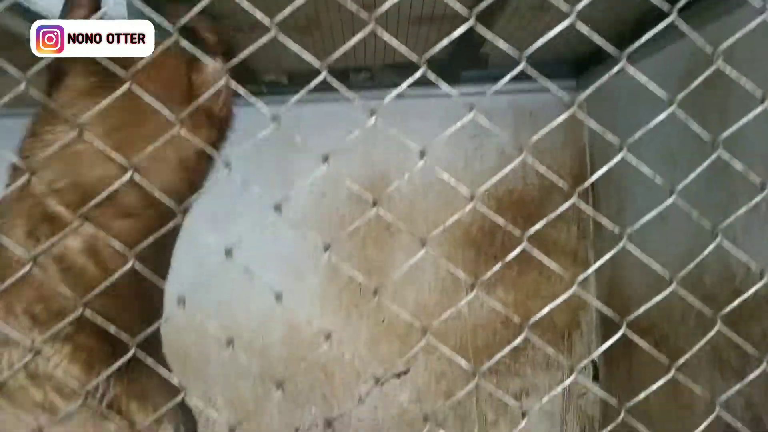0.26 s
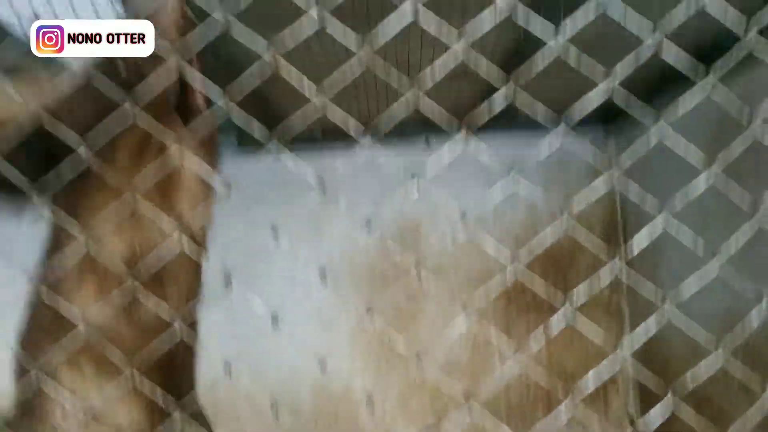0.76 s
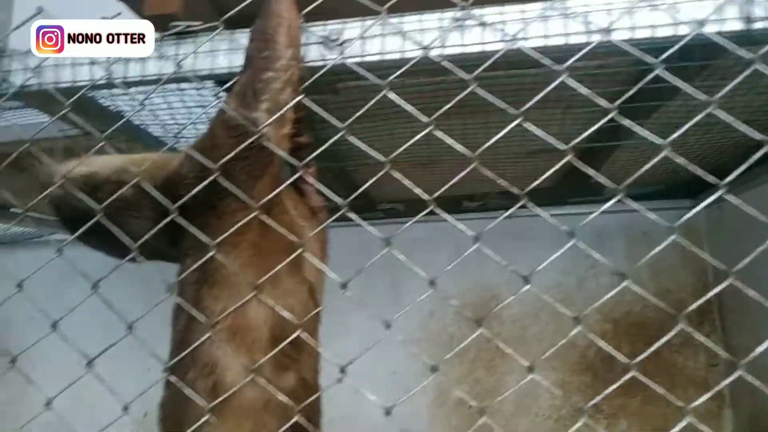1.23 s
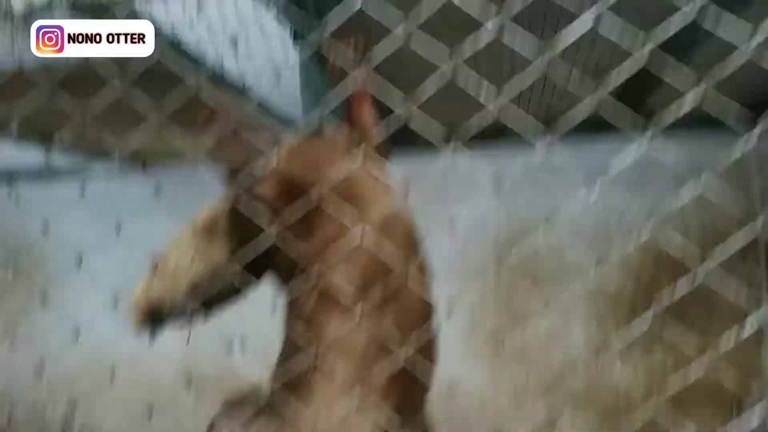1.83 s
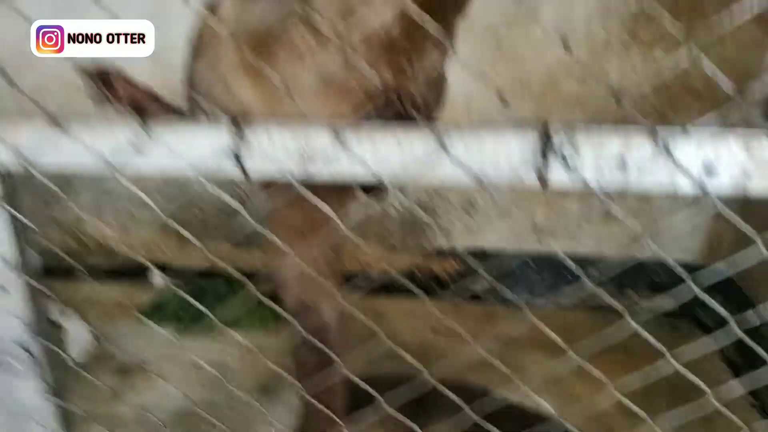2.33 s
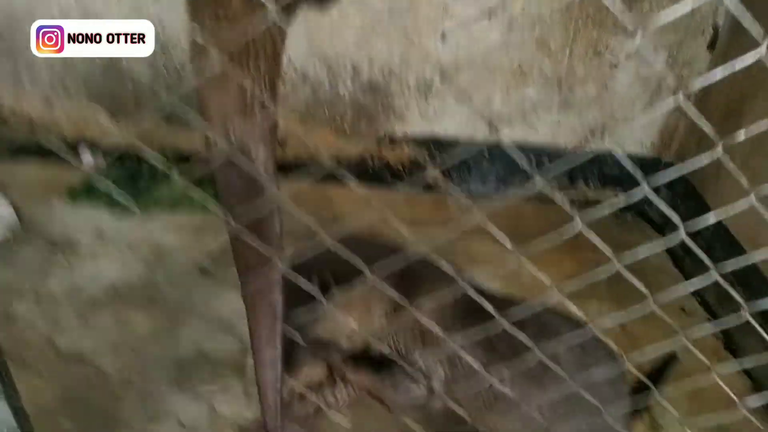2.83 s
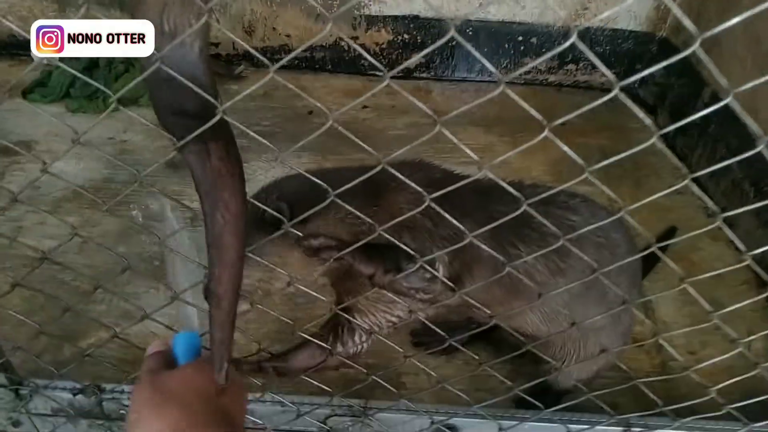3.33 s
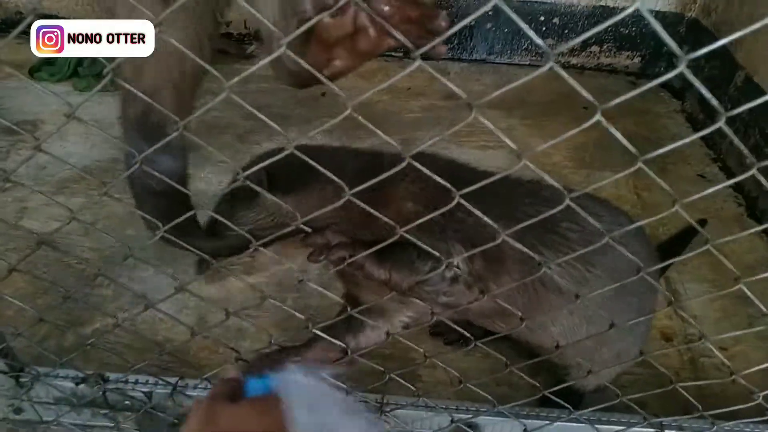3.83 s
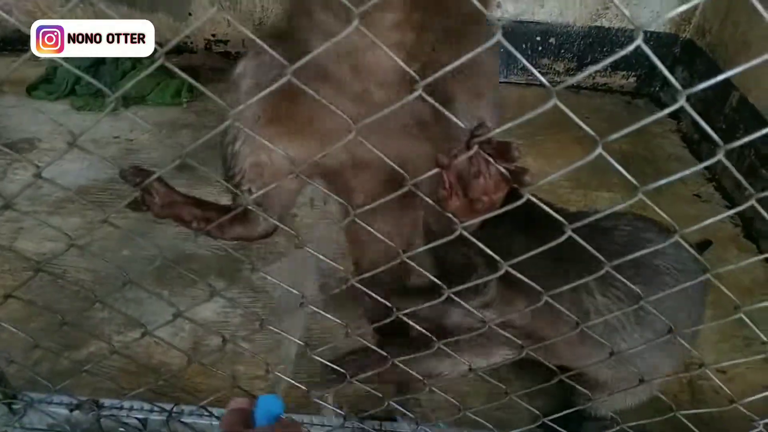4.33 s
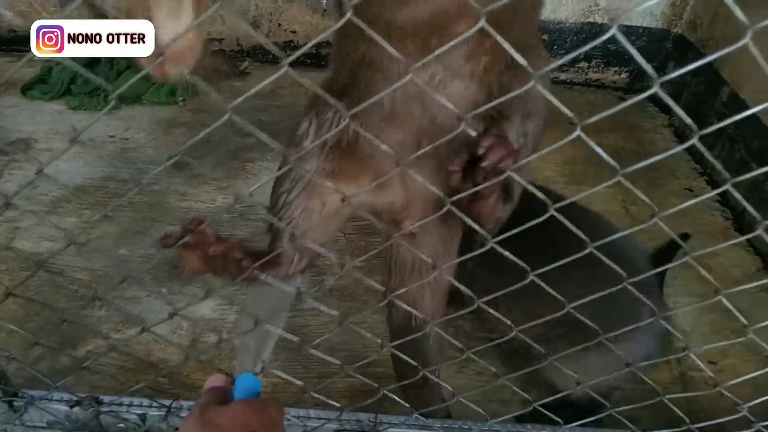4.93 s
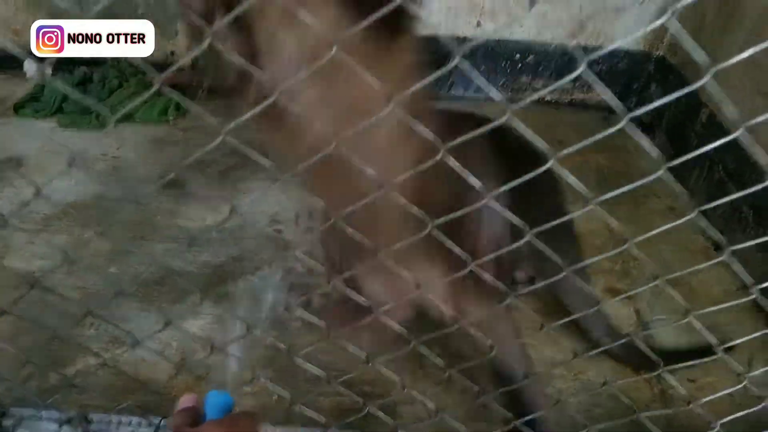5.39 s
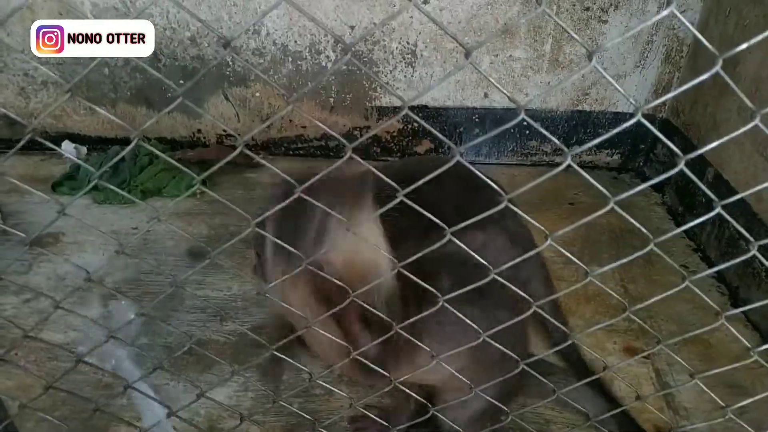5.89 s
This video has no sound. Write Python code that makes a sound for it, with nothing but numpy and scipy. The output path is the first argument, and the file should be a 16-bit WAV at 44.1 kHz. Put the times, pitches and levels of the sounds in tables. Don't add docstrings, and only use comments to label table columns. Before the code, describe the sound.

Small otters chirp sharply and squeal nasally in a hard-walled pen while a hose sprays water and claws tick on wire mesh.

```python
import sys
import numpy as np
from scipy import signal
from scipy.io import wavfile
from scipy.ndimage import uniform_filter1d

SR = 44100
rng = np.random.default_rng(int(sys.argv[2]) if len(sys.argv) > 2 else 0)


def int16_out(signal):
    q = np.round(np.clip(np.atleast_2d(signal).T, -1, 1) * 32767)
    wavfile.write(sys.argv[1], SR, q.astype(np.int16))


def voltage_ratio(level):
    return 10 ** (np.asarray(level, float) / 20)


N = 271201
LEAD_IN = 4410
SIDES = np.array([[.5], [-.5]])

# (centre [Hz], width [Hz], level [dB])
RASP = (3370, 770, -2.25)
# (centre [Hz], width [Hz], level [dB])
NOSE_TOP = (13700, 1300, -8.5)
THROAT_HZ, THROAT_WIDTH_HZ, THROAT_DB = 1800, 900, -8
NOSE_HZ, NOSE_WIDTH_HZ = 8200, 2300

# (frequency [Hz], level [dB])
OVERTONE_TRACT = [(4200, -12), (4950, 4), (5700, -20), (6600, -3.5), (8600, -13), (10900, 12), (12100, 2),
                  (13200, -13)]
# (centre [Hz], width [Hz], level [dB])
CHEST = (600, 300, -13)


def tract_gain(f, order, hz, mouth_hz, mouth, throat_db, nasal_db, throat_rasp, octave_db):
    throat = voltage_ratio(THROAT_DB - 5.0 + throat_db) * peak(f, THROAT_HZ, THROAT_WIDTH_HZ) ** 3.4
    lips = mouth * peak(f, mouth_hz, 1300) ** 3.6
    chest = voltage_ratio(CHEST[2]) * peak(f, *CHEST[:2]) ** 2
    nose = peak(f, NOSE_HZ, NOSE_WIDTH_HZ) ** 2.8 + voltage_ratio(NOSE_TOP[2]) * peak(f, *NOSE_TOP[:2]) ** 3.8
    nose = voltage_ratio(nasal_db - 14 * np.clip(hz / 200 - 6.5, 0, 1)) * nose
    rasp = throat_rasp * peak(f, *RASP[:2]) ** 2
    whistle = np.clip((hz - 1010) / 70, 0, 1)
    overtones = (order == 4) + 0.4 * (order == 6)
    overtones = voltage_ratio(octave_db + read(OVERTONE_TRACT, f)) * overtones * whistle
    return throat + lips + chest + nose + rasp + overtones


# (half pitch [Hz], level [dB])
HALF_LINES = [(650, 0), (850, -7), (1030, 2), (1180, -8), (1330, -27)]
# (start [s], end [s], ramp [s], level [dB], last line kept [number])
SHUT = [
    (2.96, 3.1, .012, -24, 1),
    (.875, 1.01, .03, -16, 2),
    (2.755, 2.775, .008, -18, 1),
    (2.826, 2.846, .008, -18, 1),
    (6.008, 6.032, .01, -18, 1),
    (6.126, 6.137, .006, -16, 1),
    (6.08, 6.088, .006, -9, 1),
]


def line_levels(t, f, order, hz, tract, low_db):
    half = voltage_ratio(read(HALF_LINES, hz) * np.sqrt(order) * (order % 2))
    size = tract * half * (f < 16000) * np.minimum(f / 900, 1) ** 0.22
    shut_db = sum(db * plateau(t, start, end, ramp) * (order > kept) for start, end, ramp, db, kept in SHUT)
    return size * voltage_ratio(low_db * (order == 1) + shut_db)


# (start [s], end [s], ramp [s], depth [0-1])
SPLIT = (1.32, 1.78, .06, .7)


def vocal_folds(t, turn, order, size, rough):
    sway = np.array([wobble(len(t), 32.0) for _ in range(2 * len(order))]).reshape(2, len(order), -1)
    blur = (.06 + rough) * order ** 1.2 / 8
    flicker = voltage_ratio(2.9 * np.minimum(0.5 + blur, 1) * sway[0])
    lines = flicker * np.cos(order * turn + order ** 2 / 2 + blur * sway[1])
    lines = lines * (1 + SPLIT[3] * plateau(t, *SPLIT[:3]) * np.cos(turn / 2) * (order > 2))
    return (size * lines).sum(0) / np.sqrt((size ** 2).sum(0) / 2)


def leaking_air(puffs, mouth_hz, mouth, strain, nasal_db):
    air = mouth * resonate(puffs, mouth_hz * .97, 140)
    air = air + strain * voltage_ratio(RASP[2] - 3.0) * resonate(puffs, RASP[0], RASP[1] / 2)
    nose = resonate(puffs, NOSE_HZ, NOSE_WIDTH_HZ / 3)
    nose = nose + voltage_ratio(NOSE_TOP[2]) * resonate(puffs, NOSE_TOP[0], NOSE_TOP[1] / 3)
    return air + voltage_ratio(nasal_db - 14.0) * nose


# (start [s], end [s], ramp [s], level [dB])
HISS = (2, 2, 1.7, -29.5)
# (centre [Hz], width [Hz], level [dB])
HISS_BANDS = [(8900, 600, 4), (10500, 800, -2), (13900, 900, 0)]


def teeth_hiss(t, puffs):
    bands = sum(voltage_ratio(db) * resonate(puffs, hz, width) for hz, width, db in HISS_BANDS)
    return voltage_ratio(HISS[3]) * plateau(t, *HISS[:3]) * bands


# (start [s], end [s], ramp [s], mouth level [dB], throat level [dB])
FORWARD = (0.78, 1.57, 0.6, -16.5, 1)
# (start [s], end [s], ramp [s], extra mouth pitch [Hz], throat gain [dB])
GAPES = [
    (1.06, 1.4, 0.23, 92, 16.5),
    (1.4, 1.66, 0.055, 30, -5),
    (1.642, 1.78, 0.17, 230, -7),
    (1.778, 1.95, 0.16, -330, -8),
    (5.894, 5.985, 0.029, 500, -20),
]
# (start [s], end [s], ramp [s], extra nasal edge [dB])
EDGY = [
    (1.03, 1.301, 0.051, 18),
    (1.282, 1.59, 0.072, 14.5),
    (2.635, 2.788, 0.012, 0),
]
# (start [s], end [s], ramp [s], extra roughness [0-1])
STRAIN = (1.36, 1.618, 0.07, 0.39)
# (centre [Hz], width [Hz])
BREATH = (7600, 3000)


def squeal(rows, rest_hz, calm_rough, edge_db, octave_db, low_db, air_share=2.5, breath_db=-14):
    s, (hz, db) = unrolled(rows)
    t = s + np.arange(len(hz)) / SR
    hz = uniform_filter1d(hz, size=260, mode="nearest")

    forward = plateau(t, *FORWARD[:3])
    mouth = voltage_ratio(FORWARD[3] * forward)
    gape_hz, throat_db = sum(np.outer(gape[3:], plateau(t, *gape[:3])) for gape in GAPES)
    mouth_hz = np.maximum(2 * hz, rest_hz) + gape_hz
    nasal_db = edge_db + sum(spell[3] * plateau(t, *spell[:3]) for spell in EDGY)
    strain = plateau(t, *STRAIN[:3])
    rough = np.clip(calm_rough * np.minimum(1300 / hz, 1) ** 2 + STRAIN[3] * strain, 0, 1)
    throat_rasp = np.maximum(strain * voltage_ratio(RASP[2]), forward * voltage_ratio(FORWARD[4]))

    turn = 2 * np.pi * np.cumsum(hz * (1 + 0.0413 * rough * wobble(len(hz), 171))) / SR
    order = np.arange(1, 26)[:, None]
    f = order * hz
    tract = tract_gain(f, order, hz, mouth_hz, mouth, throat_db, nasal_db, throat_rasp, octave_db)
    size = line_levels(t, f, order, hz, tract, low_db)
    folds = vocal_folds(t, turn, order, size, rough)

    puffs = (1.5 + np.exp(-(turn / (2 * np.pi) % 1) / 2.5)) * rng.standard_normal(len(hz))
    air = leaking_air(puffs, mouth_hz, mouth, strain, nasal_db)
    breath = 0.23 * evened(np.diff(puffs, prepend=0)) + resonate(puffs, *BREATH)
    voice = np.sqrt(1 - rough ** 2) * folds + air_share * rough * air + voltage_ratio(breath_db) * breath
    loudness = voltage_ratio(db + 1.4 * wobble(len(hz), 39))
    return s, (loudness * voice + teeth_hiss(t, puffs)) * signal.windows.tukey(len(hz), .04)


# (frequency [Hz], level [dB])
WHISTLE_TRACT = [(2500, -22), (4000, -2.5), (4600, -1), (5200, -8.5), (6200, 2), (7200, -6), (8300, -1),
                 (9600, -6)]
# (frequency [Hz], left minus right [dB])
SHADOW = [(4300, 1.5), (5500, 2), (6500, -7), (9000, -5)]


def chirp(rows, flutter, overtone_db=-29):
    s, (hz, effort_db) = unrolled(rows)
    db = effort_db + read(WHISTLE_TRACT, hz) + 2.6 * wobble(len(hz), 105)
    hz = uniform_filter1d(hz, size=90) * (1 + 0.0043 * wobble(len(hz), 450))
    turn = 2 * np.pi * np.cumsum(hz) / SR
    octave = voltage_ratio(overtone_db + read(OVERTONE_TRACT, 2 * hz)) * np.sin(2 * turn) * (hz < 7500)
    tone = np.sin(turn) + octave
    flutter_hz = 257.8 * (1 + .3 * wobble(len(hz), 43.5))
    throb = 1 + flutter * np.sin(2 * np.pi * np.cumsum(flutter_hz) / SR)
    level = np.sqrt(2) * voltage_ratio(db + SIDES * read(SHADOW, hz))
    return s, level * tone * throb * signal.windows.tukey(len(hz), .05)


# (time [s], half pitch [Hz], level [dB])
GLIDES = [
    [(.775, 2895, -15), (.79, 3240, -4), (.798, 3230, -7.5), (.803, 2950, -13.5), (.812, 2620, -5.5),
     (.822, 1940, -3), (.836, 1630, -4.5), (.851, 1140, -5), (.878, 930, -35), (.945, 800, -40)],
    [(2.57, 2728, -24), (2.582, 2900, -17), (2.59, 2890, -21), (2.6, 2750, -8.5), (2.605, 2400, -13.5),
     (2.61, 1980, -17), (2.621, 1481, -3.5), (2.637, 1240, -22)],
    [(5.826, 2908, -37), (5.84, 2480, -21), (5.85, 1947, -22), (5.866, 1610, -28), (5.895, 1690, -21.5),
     (5.926, 1680, -25.5), (5.942, 1480, -17), (5.958, 1256, -14), (5.975, 1215, -18.5)],
]
# (time [s], half pitch [Hz], level [dB])
HOLDS = [
    [(1.0, 531, -30.5), (1.151, 652, -18), (1.2, 661, -22), (1.3, 632.7, -16), (1.42, 619, -25),
     (1.47, 599, -22), (1.53, 577.3, -21.5), (1.62, 591, -22), (1.66, 615.7, -18), (1.682, 612, -24),
     (1.71, 639, -19.5), (1.744, 662.5, -19), (1.8, 648.6, -22), (1.866, 621, -22), (1.876, 615, -40),
     (1.91, 620, -60)],
    [(2.677, 962, -25), (2.73, 1097, -18), (2.765, 1020, -34.5), (2.8, 1160, -22), (2.831, 1035, -31.5),
     (2.866, 1109, -19), (2.911, 940, -22.5), (2.964, 954, -24.5), (2.99, 770, -46)],
    [(5.992, 1131, -17), (6.015, 1110, -28), (6.045, 1200, -20.5), (6.065, 1225, -19.5),
     (6.088, 1147, -28.5), (6.108, 1094, -17.5), (6.13, 1100, -32.5), (6.15, 1090, -13)],
]
# (rest mouth pitch [Hz], roughness [0-1], nasal edge [dB],
# overtones of the whistle [dB], lowest line [dB])
MANNERS = [
    (2350, 0.16, -16.5, -19, -6.5),
    (1820, 0.1, -9.5, -11.5, 3),
    (2120, 0.08, -9, -5.5, 11),
]
SQUEAL_LAGS = -4, 4, 2
# (time [s], pitch [Hz], effort [dB])
CHIRPS = [
    [(-.085, 8260, -15), (-.06, 8050, -17), (-.02, 5900, -4.5), (.007, 4300, -10), (.022, 4200, -36)],
    [(1.244, 8050, -18), (1.252, 8150, -15), (1.273, 8200, -20), (1.288, 7500, -4), (1.31, 6400, -6.5),
     (1.325, 5400, -14), (1.333, 4600, -8.5), (1.352, 4500, -10), (1.374, 4350, -17.5)],
    [(2.178, 9450, -12), (2.186, 9500, -8), (2.191, 8350, -8.5), (2.213, 8250, -5), (2.224, 7550, -1),
     (2.228, 6500, -4), (2.245, 5750, -1.5), (2.263, 4100, -9), (2.285, 3900, -17.5)],
    [(2.754, 9300, -11.5), (2.759, 8350, -14), (2.782, 8050, -4), (2.795, 7000, -5), (2.802, 6300, -12.5),
     (2.815, 5900, -5), (2.828, 4200, -14.5), (2.845, 3900, -15.5)],
    [(5.529, 9700, -19), (5.54, 9750, -5.5), (5.543, 9050, -3), (5.551, 8900, -6), (5.553, 8000, -2),
     (5.563, 6500, -12), (5.573, 6000, 0), (5.582, 4800, -8.5), (5.606, 4450, -9)],
]
# (time [s], pitch [Hz], effort [dB])
RISING_CHIRPS = [
    [(3.298, 8100, -7.5), (3.31, 8990, -3), (3.322, 8840, -0.5), (3.338, 8850, -9), (3.345, 7330, 2),
     (3.36, 6120, -4), (3.372, 5480, -0.5), (3.378, 4820, -6), (3.402, 2380, -25)],
    [(3.782, 8080, -6), (3.79, 8190, -3), (3.794, 8450, -2.5), (3.817, 8900, -5), (3.821, 7860, 2),
     (3.834, 8050, -10), (3.855, 4926, 1.5), (3.872, 4410, -11.5), (3.886, 2850, -18)],
    [(4.789, 7840, -19), (4.797, 8000, 0.5), (4.812, 8530, -6.5), (4.83, 8640, -7.5), (4.838, 6700, -7),
     (4.852, 6020, -1), (4.858, 4830, -5.5), (4.874, 4210, -10.5)],
]
FLUTTERS = [.2, 0.73, 0.12, 0.23, 0.1, 0.78, 0.11, 0.27]
CHIRP_LAGS = [4, 10, 10, 4, 9, 3, 3, 10]


def otters():
    both = np.zeros((2, N + LEAD_IN))
    for glide, hold, manner, lag in zip(GLIDES, HOLDS, MANNERS, SQUEAL_LAGS):
        s, sound = squeal(glide + hold, *manner)
        add(both[int(lag > 0)], s, sound)
        add(both[int(lag < 0)], s + abs(lag) / SR, voltage_ratio(-3.5) * sound)
    for rows, flutter, lag in zip(CHIRPS + RISING_CHIRPS, FLUTTERS, CHIRP_LAGS):
        s, sound = chirp(rows, flutter)
        add(both[0], s + lag / SR, sound[0])
        add(both[1], s, sound[1])
    return both


NEAR_WALLS = [
    [(37, .3), (88, -.25), (151, .2)],
    [(29, -.3), (104, .25), (173, -.2)],
]
# (frequency [Hz], t60 [s])
PEN = [(300, 0.28), (1500, 0.32), (4500, 0.92), (8500, 0.56), (14000, 0.74)]
# (frequency [Hz], level [dB])
PEN_COLOUR = [(600, 11.5), (2350, 4.5), (3200, -2), (4100, 0.5), (4600, -1.5), (5400, -3), (8500, 1.5),
              (14000, 3.5)]


def pen(x, late_db=-8):
    early = np.zeros((2, 200))
    for side, walls in enumerate(NEAR_WALLS):
        for delay, share in walls:
            early[side, delay] = share
    early[:, 0] = 1

    taps = np.zeros((2, SR))
    places = np.arange(300, SR - 20, 20)
    jitter = rng.integers(0, 20, (2, len(places)))
    np.put_along_axis(taps, places + jitter, rng.choice([-1., 1.], (2, len(places))), 1)
    taps[1] = taps[1] + 0.16 * taps[0]

    hz, t, z = signal.stft(taps, SR, nperseg=256)
    swell = 1 - np.exp(-(t / 0.014) ** 2)
    decay = voltage_ratio(read(PEN_COLOUR, hz)[:, None] - 60 * t / read(PEN, hz)[:, None])
    tail = signal.istft(z * swell * decay, SR, nperseg=256)[1]
    tail = voltage_ratio(late_db) * tail / np.linalg.norm(tail, axis=1)[:, None]
    tail[:, :200] += early
    return signal.fftconvolve(x, tail, axes=1)[:, LEAD_IN:N + LEAD_IN]


# (time [s], level [dB])
JET = [(0, -33), (.27, -33.5), (.7, -32.5), (.97, -32), (1.13, -30), (1.42, -30), (1.8, -30.5),
       (1.87, -36.5), (2.14, -33), (2.55, -34.5), (2.7, -30.5), (2.93, -31.5), (3.13, -39), (3.45, -36),
       (4.28, -31.5), (4.62, -36), (5.77, -35.5), (6.05, -29.5)]
# (time [s], level [dB])
GUSTS = [(.78, -1), (2.28, 0.5), (3.508, 4), (3.7, 0.5), (3.76, 4), (3.95, 2.5), (4.112, 3.5), (4.331, 3.5),
         (4.74, 3), (5.0, 2.5), (5.091, 3), (5.229, 4), (5.381, 3), (5.47, 1.5), (5.84, 3.5)]
# (time [s], level [dB])
SLOPS = [(.6, 3), (.97, -4), (1.15, 2.5), (1.28, -11), (1.42, 0.5), (1.7, -2.5), (2.7, -3.5), (2.91, 5),
         (3.65, 6), (4.25, 6.5), (4.62, 5.5), (4.98, 6.5), (5.33, 7.5), (3.3, 3.5), (5.56, 5.5),
         (6.01, 0.5), (6.12, -10)]
# (level at the usual force [dB], follow [dB per dB of jet])
LAYER_FOLLOW = [
    (-40, 0.27),
    (-35.5, 1.9),
    (-34, 1.79),
]


def flow_db(t):
    usual_jet_db, gust_s, slop_s = -34, 0.046, 0.12
    force = np.interp(t, *np.transpose(JET)) + bumps(t, GUSTS, gust_s) - usual_jet_db
    gurgle, splash, spray = (db + follow * force for db, follow in LAYER_FOLLOW)
    return gurgle + bumps(t, SLOPS, slop_s), splash, spray


# (frequency [Hz], level [dB per Hz])
GURGLE = [(40, -3), (110, -36), (170, 1), (350, -3), (700, -4), (1300, -3), (2500, -8), (5000, -15.5)]
# (frequency [Hz], level [dB per Hz])
SPLASH = [(700, -11.5), (1800, -10), (3000, -1.5), (4500, -0.5), (6500, -0.5), (8500, -8.5), (12000, -100)]
# (frequency [Hz], level [dB per Hz])
SPRAY = [(4000, -12), (7000, 4), (10000, 9), (11300, 8), (12500, 3), (14000, 4.5), (15500, 5), (17000, 3.5)]
# (frequency [Hz], likeness [-1 to 1])
SAME = [(60, -0.72), (180, 1), (550, 0.36), (1650, 0.039), (4970, -0.17), (15000, -0.37)]
# (frequency [Hz], left minus right [dB])
LEAN = [(60, -4), (240, 3), (950, 2), (3770, -2.5), (15000, -8)]


def water(patchy_db=2.5, flicker_db=2.0):
    frames, hz = N // 128 + 5, np.fft.rfftfreq(512, 1 / SR)
    a, b, c, d, patches, flicker = rng.standard_normal((frames, 257, 6)).T
    patches = evened(uniform_filter1d(uniform_filter1d(patches, size=6, axis=0), size=30, axis=1))
    flicker = evened(uniform_filter1d(uniform_filter1d(flicker, size=160, axis=0), size=7, axis=1))

    power = 0
    for shape, db in zip((GURGLE, SPLASH, SPRAY), flow_db(np.arange(frames) * 128 / SR)):
        colour = evened(voltage_ratio(read(shape, hz)))
        power = power + (colour[:, None] * voltage_ratio(db)) ** 2

    same = np.clip(read(SAME, hz), -1, 1)[:, None]
    right = a + 1j * b
    lag = np.exp(-2j * np.pi * hz * 8.4 / SR)[:, None]
    left = lag * same * right + np.sqrt(1 - same ** 2) * (c + 1j * d)
    z = np.array([left, right])
    z *= voltage_ratio(SIDES * read(LEAN, hz))[:, :, None]
    z *= np.sqrt(power) * voltage_ratio(patchy_db * patches + flicker_db * flicker)
    return 0.079 * signal.istft(z, nperseg=512, noverlap=384)[1][:, :N]


def droplets(per_s=700, spread_db=7.0, level_db=-9):
    size = voltage_ratio(spread_db * np.minimum(rng.exponential(1, (2, N)), 5))
    size = size * (rng.random((2, N)) < per_s / SR)
    kind, out = rng.integers(0, 16, (2, N)), 0
    for k, hz in enumerate(np.geomspace(2500, 14000, num=16)):
        t = np.arange(round(5.0 * SR / hz)) / SR
        grain = np.sin(2 * np.pi * hz * t * (1 + 0.056 * hz * t)) * np.hanning(len(t))
        out = out + signal.oaconvolve(size * (kind == k), grain[None], axes=1)[:, :N]
    return evened(out + 0.046 * out[::-1]) * voltage_ratio(flow_db(np.arange(N) / SR)[1] + level_db)


# (time [s], peak level [dB], ring [Hz], left minus right [dB])
TICKS = [(0.125, -24.5, 6040, 3), (0.3615, -29, 5200, -3), (0.393, -27, 6940, -11), (0.486, -30, 3220, -19),
         (0.608, -35, 2930, -20), (0.653, -29.5, 3440, -17), (0.764, -30.5, 5840, -10),
         (1.974, -52, 6000, -4), (1.984, -36, 4000, -9), (2.029, -38.5, 3330, -3), (2.083, -36, 3120, -6),
         (2.099, -27.5, 2630, -12), (2.157, -27.5, 9240, -13), (2.515, -19.5, 2900, -4),
         (3.2149, -24, 1355, -4), (3.273, -33, 8500, -13), (3.576, -27, 12500, -8),
         (3.697, -30.5, 8300, -3), (4.0394, -40, 7810, -1), (4.109, -38, 5760, -24), (4.573, -36, 4750, -5),
         (4.636, -35, 8970, -6), (4.714, -33.5, 8400, -17), (4.956, -31.5, 4510, 1),
         (5.2043, -31.5, 6040, -22), (5.239, -27.5, 7500, -10), (5.3334, -26, 3900, -11),
         (5.3726, -30, 2750, -6), (5.376, -31, 10000, -6), (5.467, -32, 10900, -4), (5.511, -35, 12000, -2),
         (5.753, -40, 8000, -3), (5.7697, -26.5, 9400, -6), (5.797, -31, 9000, -10),
         (6.108, -21.5, 8500, -2)]


def ticks():
    out, t = np.zeros((2, N + LEAD_IN)), np.arange(1300) / SR
    for (s, db, hz, pan_db), noise in zip(TICKS, rng.standard_normal((len(TICKS), 2, 1300))):
        snap = np.diff(noise[0], prepend=0) * voltage_ratio(-60 * t / 0.0068)
        ring = signal.lfilter(*signal.iirpeak(hz, 3.5, fs=SR), noise[1])
        ring = ring * voltage_ratio(-60 * t / 0.054) * (1 - np.exp(-t / 0.00026))
        add(out, s, voltage_ratio(db + SIDES * pan_db) * (snap + 4.1 * ring))
    return out[:, LEAD_IN:]


# (start [s], end [s], level [dB])
PUMP = [
    (-.1, 0.77, -47.5),
    (1.451, 1.609, -52),
    (1.876, 3.23, -49.5),
    (3.548, 3.804, -54),
    (4.104, 5.026, -48),
    (5.03, 6.114, -49.5),
]
# (frequency [Hz], level [dB])
PUMP_ORDERS = [(380, -1.5), (752, -2.5), (1125, -14)]


def pump():
    turn = 2 * np.pi * np.cumsum(1 + 0.00858 * wobble(N, 4.66)) / SR
    lines = sum(voltage_ratio(db + 5.23 * wobble(N, 4.6)) * np.sin(hz * turn) for hz, db in PUMP_ORDERS)
    t, ramp_s = np.arange(N) / SR, 0.055
    return sum(voltage_ratio(db) * plateau(t, start, end, ramp_s) for start, end, db in PUMP) * lines


def evened(x):
    return x / np.sqrt(np.mean(x ** 2) + 1e-20)


def read(points, hz):
    f, value = np.transpose(points)
    return np.interp(np.log(hz + 1), np.log(f + 1), value)


def add(mix, s, sound):
    part = mix[..., max(round(s * SR) + LEAD_IN, 0):][..., :sound.shape[-1]]
    part += sound[..., :part.shape[-1]]


def wobble(size, hz):
    noise = rng.standard_normal(size + 2000)
    return evened(signal.lfilter(*signal.butter(2, hz, fs=SR), noise)[2000:])


def unrolled(rows):
    s, *columns = np.transpose(rows)
    t = np.arange(s[0], s[-1], 1 / SR)
    return s[0], [np.interp(t, s, c) for c in columns]


def peak(hz, centre_hz, width):
    return 1 / np.sqrt(1 + (2 * (hz - centre_hz) / width) ** 2)


def resonate(x, hz, width):
    turn = np.exp(2j * np.pi * np.cumsum(hz * np.ones(len(x))) / SR)
    r = np.exp(-2 * np.pi * width / SR)
    return evened((turn * signal.lfilter([1], [1, -2 * r, r * r], x / turn)).real)


def plateau(t, start, end, ramp):
    return np.clip(np.minimum(t - start, end - t) / ramp + .5, 0, 1)


def bumps(t, events, width):
    return sum(db * np.exp(-((t - s) / width) ** 2) for s, db in events)


def scene():
    return pen(otters()) + water() + droplets() + pump() + ticks()


def masked(x, margin_db=17.5, whim_db=10):
    z = signal.stft(x, nperseg=2048, noverlap=1536)[2]
    power = uniform_filter1d((abs(z) ** 2).mean(0), size=12, axis=0)[::12]
    level_db = uniform_filter1d(10 * np.log10(power + 1e-16), size=3, axis=1)
    neighbours_db = [np.roll(level_db, k, axis=0) - 1.8 * max(k - 9, 0) for k in range(-5, 30)]
    loudest_db = np.max(neighbours_db, axis=0)
    whim = evened(uniform_filter1d(rng.standard_normal(level_db.shape), size=4, axis=1))
    keep = (level_db + margin_db + whim_db * np.maximum(whim, -1.25) > loudest_db) * 1.
    keep[:12] = 1
    kept = z * np.repeat(keep, 12, axis=0)[:1025]
    return signal.istft(kept, nperseg=2048, noverlap=1536)[1][:, :N]


def roll_off(x):
    return signal.sosfilt(signal.butter(12, 15850, fs=SR, output="sos"), x)


def record(dry):
    power_db = 10 * np.log10(abs(uniform_filter1d((dry ** 2).mean(0), size=600)) + 1e-12)
    fall = np.arange(N) * 110. / SR
    over_db = np.maximum(np.maximum.accumulate(power_db + fall) - fall + 12.5, 0)
    grip = np.exp(-1 / (.018 * SR))
    ducked = dry / voltage_ratio(0.81 * signal.lfilter([1 - grip], [1, -grip], over_db))

    held = .66 * np.tanh(ducked / .66)
    low_cut = signal.butter(4, 185, "high", fs=SR, output="sos")
    held = signal.sosfilt(low_cut, held) + voltage_ratio(-21.0) * ducked
    top_edge = signal.firwin(511, 15800, window=("kaiser", 9), fs=SR)
    edged = signal.oaconvolve(held, top_edge[None], "same")
    return roll_off(masked(edged))


dry = scene()
out = record(dry)
int16_out(out)
```